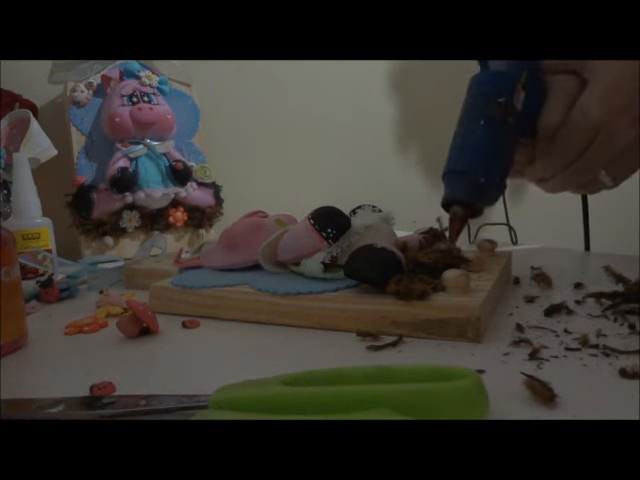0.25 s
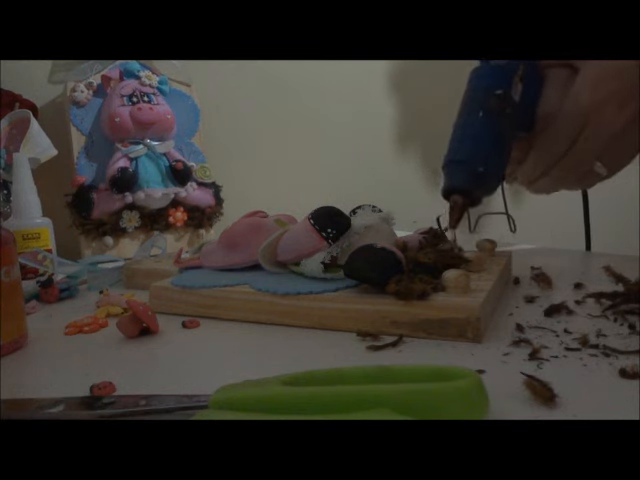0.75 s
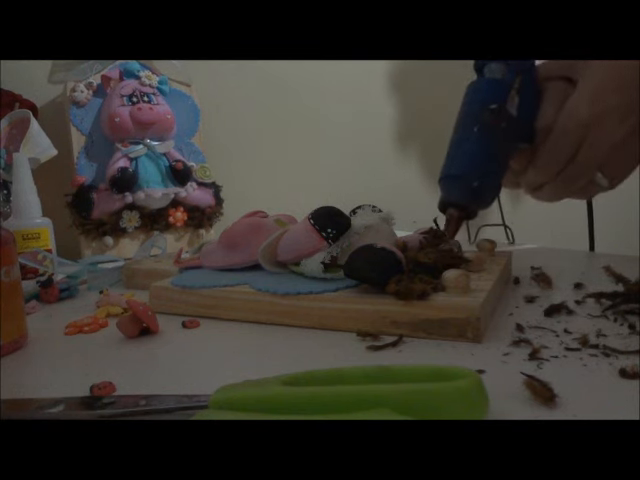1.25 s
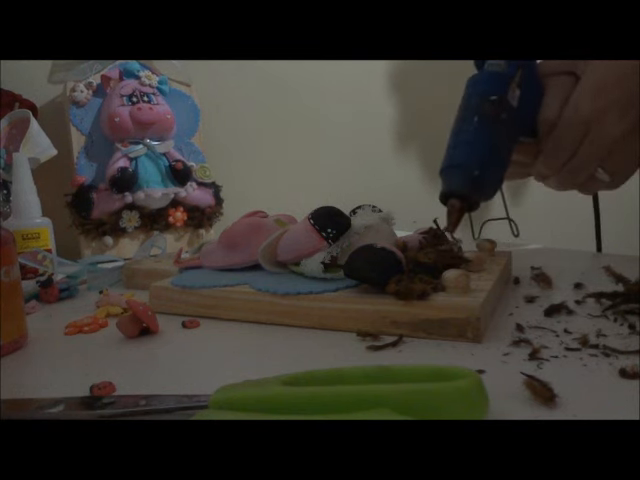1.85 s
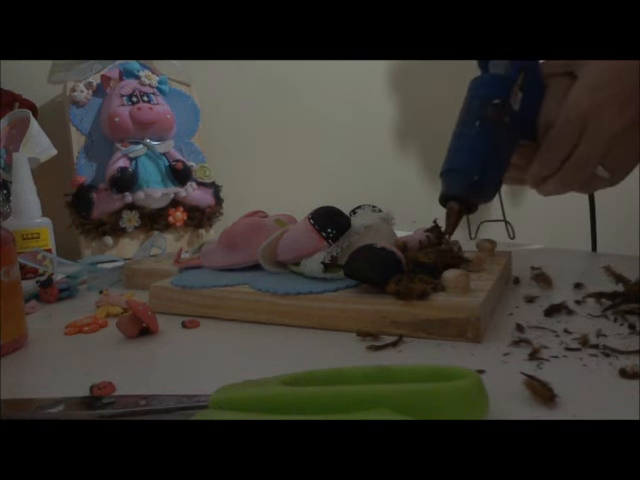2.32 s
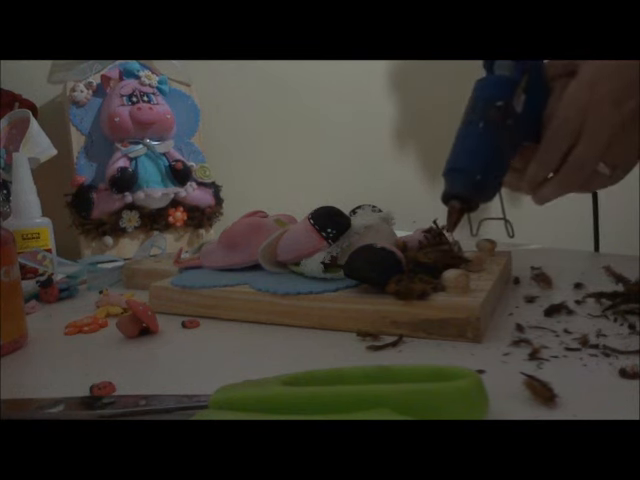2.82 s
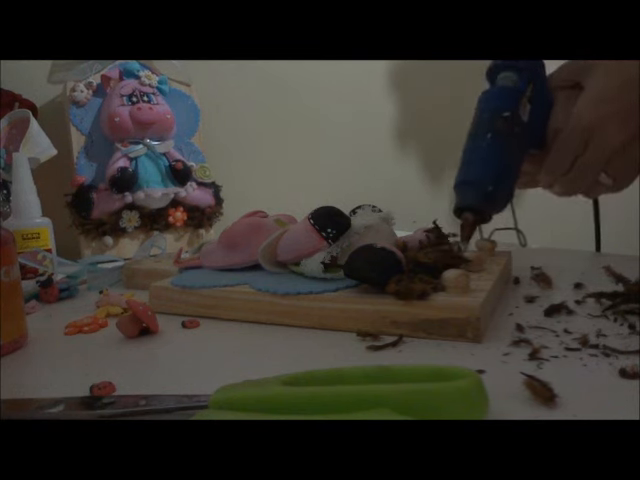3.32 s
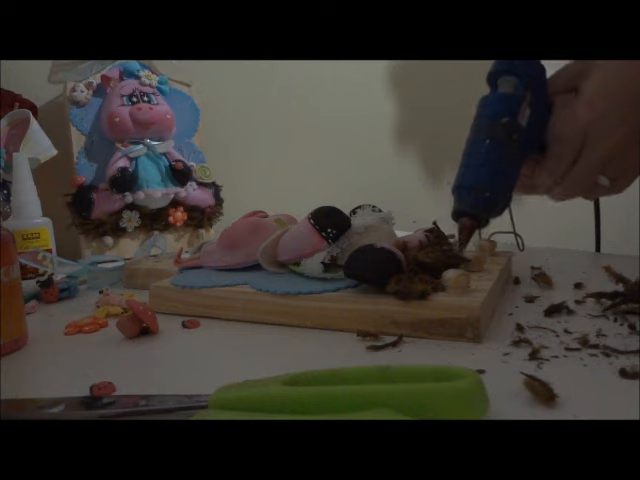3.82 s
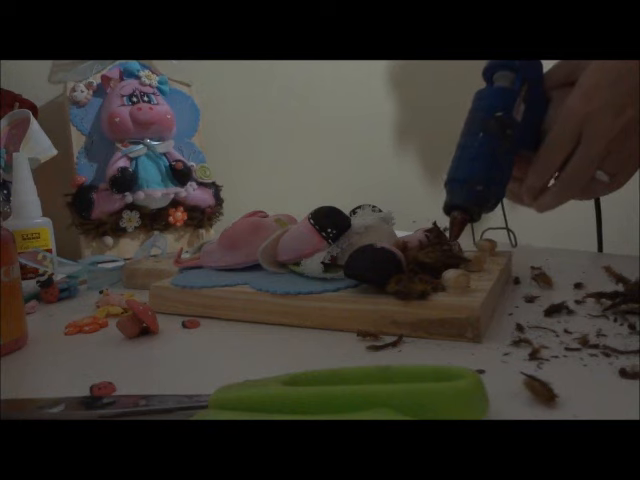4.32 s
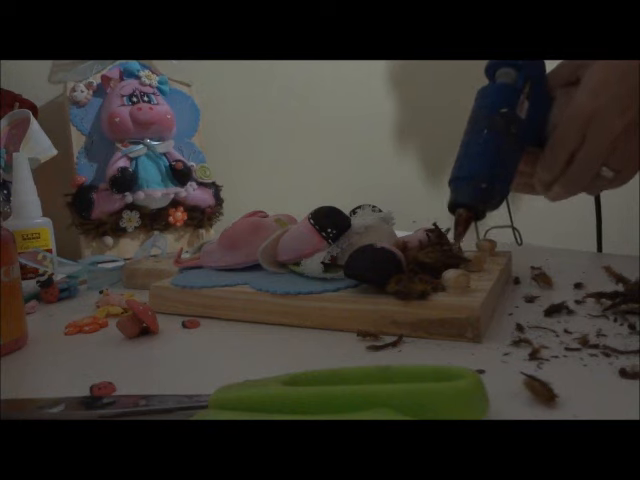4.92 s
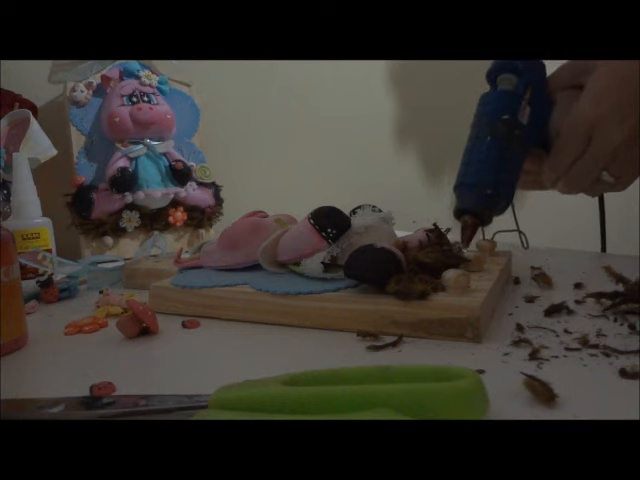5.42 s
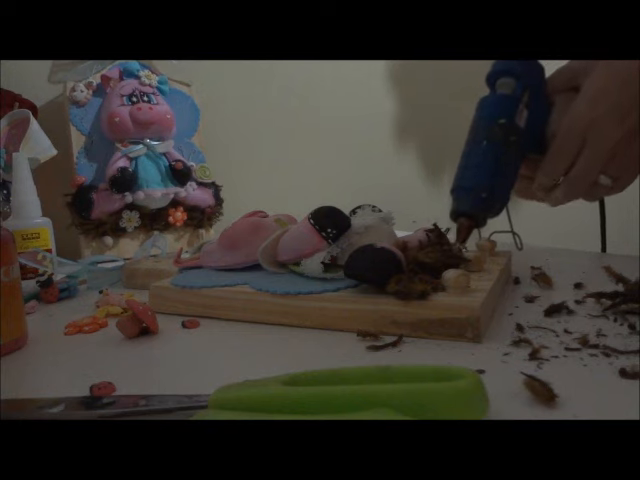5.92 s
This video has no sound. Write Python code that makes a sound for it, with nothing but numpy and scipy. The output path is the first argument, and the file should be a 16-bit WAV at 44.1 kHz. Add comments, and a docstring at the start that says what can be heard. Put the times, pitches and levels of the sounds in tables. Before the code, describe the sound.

A hot glue gun's trigger is pumped nine times at a steady pace. Each squeeze gives a short plastic creak as the glue stick feeds. Between squeezes the trigger clicks sharply and a spring pulls the feed back with a brief rasp. Something softly bumps the table at the end. The gun is slightly right of the microphones, in a small, quiet room.

```python
"""A plastic creak opens the scene: a hot glue gun is squeezed nine times in a small, quiet room.
Each squeeze creaks because the feed, the part that pushes the glue stick, keeps sticking and slipping;
some end in one hard, clicking slip. Between squeezes the trigger clicks as the finger eases off, and
a spring drags the feed back in a short rasp. Something softly bumps the craft table at the end."""
import sys
import numpy as np
from scipy import signal
from scipy.fft import rfft, irfft
from scipy.io import wavfile
from scipy.ndimage import uniform_filter1d, minimum_filter1d

SR = 44100
rng = np.random.default_rng(int(sys.argv[2]) if len(sys.argv) > 2 else 0)


def output_pcm(signal):
    """Save a mono or channel-first signal as 16-bit PCM at the path in sys.argv[1].

    Samples are clipped to [-1, 1] before scaling.
    """
    pcm = np.clip(np.atleast_2d(signal).T, -1, 1) * 32767
    wavfile.write(sys.argv[1], SR, np.round(pcm).astype(np.int16))


N = 271950
FILTER_HZ = np.fft.rfftfreq(8192, 1 / SR)

# One row for each squeeze. The "bite" is the moment the feed takes hold of the glue stick.
# start_s, bite_s, end_s, bite_slips_per_s, middle_slips_per_s, end_slips_per_s, pressure_build_s,
# creep_db, squeak_db, knock_db, tick_db, squeak_change_db, end_treble_db
SQUEEZES = [ (-0.15, -0.068, 0.234, 74.7, 67.4, 58.6, 0.011, 0, -26.5, -25, -30, -5.5, -1),
            (0.727, 0.793, 1.111, 72, 87.7, 63.4, 0.15, -6, -22, -23.5, -25, -3.5, 0),
            (1.568, 1.616, 1.839, 89, 85, 92.6, 0.13, -8, -20.5, -21, -26.5, -4.5, -9),
            (2.259, 2.336, 2.586, 103.4, 57.8, 97, 0.017, 2.5, -19.5, -24, -27, -8.5, -3),
            (3.01, 3.066, 3.279, 76, 90, 80, .036, -3, -20.5, -23, -27.5, -4, -8.5),
            (3.678, 3.767, 4.012, 100, 81.6, 71, .02, 3, -20.5, -23.5, -26.5, -8.5, -4),
            (4.464, 4.555, 4.839, 58.6, 52, 86, 0.017, 10, -21.5, -23.5, -24.5, -5, -7),
            (5.244, 5.307, 5.517, 89, 80, 79, 0.049, 1, -18.5, -21.5, -25.5, -8, -9),
            (5.963, 6.016, 6.155, 99, 98.5, 63, 0.044, -2.5, -20, -19.5, -24, -4, -10), ]


def squeeze_creaks():
    """The feed creeps faintly over the stick, bites, and knocks harder as pressure builds."""
    # tone of a slip knocking on the shell: pitch_hz, level_db
    knock_tone = [(30, -53), (300, -36.5), (480, -25.5), (660, -3), (850, -4.5), (1050, -9.5), (1250, 4),
                  (1700, 0.5), (2050, -6), (2700, -1), (4000, -11), (5200, -9), (8000, -26), (15500, -20)]
    # each group of three is (squeak, knock, tick)
    creep_end_db, creep_rise_db_per_s = (-13, -15, -27.5), (257, 234, 369)
    bite_db = (-11.5, -21, -11.5)  # compared with full pressure
    first_slips_per_s, knock_build_s = 92, 0.064
    knock_growth_db, tick_growth_db = 2.5, 1.5
    strokes = []
    for start, bite, end, early, middle, late, build_s, creep_db, *levels, change_db, _ in SQUEEZES:
        full_db, slips = np.array(levels), []
        for s, stuck_s in slip_times(start, bite - 1 / early, [first_slips_per_s, early], jitter=0.06):
            fade_in_db = np.multiply(creep_rise_db_per_s, s - bite)
            slips.append((s, stuck_s, *(full_db + creep_db + creep_end_db + fade_in_db)))
        for s, stuck_s in slip_times(bite, end, [early, middle, late], jitter=0.06):
            build_db = bite_db * np.exp((bite - s) / np.array([build_s, knock_build_s, build_s]))
            progress = (s - bite) / (end - bite)
            drift_db = np.array([change_db, knock_growth_db, tick_growth_db]) * progress
            slips.append((s, stuck_s, *(full_db + build_db + drift_db)))
        strokes.append([slip for slip in slips if slip[0] >= 0])
    return stick_slip(strokes, knock_tone, squeak_db=-3.0, knock_db=-1.0, tick_db=-3.5, squeak_hz=2021,
                      knock_s=0.0045, tick_s=0.0013, knock_snap=0.11, tick_snap=0.42,
                      force_spread_db=1.82, squeak_spread_db=2.5, tick_spread_db=2.5)


def brighten_with_pressure(creaks):
    """Some squeezes tick more brightly than others, and each brightens as pressure builds."""
    treble = signal.sosfiltfilt(signal.butter(4, 11000, "high", fs=SR, output="sos"), creaks)
    growth_db, points = 8.5, []
    for _, bite, end, *_, end_db in SQUEEZES:
        points += [(bite, end_db - growth_db), (end, end_db)]
    treble_db = np.interp(np.arange(N) / SR, *np.transpose(points))
    return creaks + treble * (gain(treble_db) - 1)


def spring_rasps():
    """The spring snatches the feed back: a quick rise, a short hold, then the rasp dies away."""
    # each pull back: start_s, hold_s, first_slips_per_s, last_slips_per_s, squeak_db, knock_db, tick_db
    pulls = [ (0.471, 0.05, 88, 72.5, -34.5, -21, -23.5), (1.325, 0.043, 86.3, 96, -33, -22.5, -24),
             (2.034, 0.033, 117, 87, -34, -20.5, -25), (2.769, 0.026, 110, 75, -31, -21.5, -24),
             (3.453, 0.026, 81, 86, -31, -20, -23), (4.21, .044, 92, 92, -32, -21, -23.5),
             (5.007, 0.027, 92.7, 73.8, -32.5, -19.5, -22.5), (5.699, 0.031, 101, 67, -29, -21, -23.5), ]
    # tone of the knocks on the way back: pitch_hz, level_db
    rasp_tone = [(30, -46), (300, -36), (500, -25), (660, -2), (830, -4.5), (1050, -8), (1250, 1),
                 (1700, -3.5), (2700, -7), (4000, -16), (5100, -11.5), (8000, -24.5), (16000, -24)]
    length_s, rise_s = 0.145, 0.0067
    # each group of three is (squeak, knock, tick)
    start_db, fall_delay_s, fall_db_per_s = (-4, 0, -11), (0.018, 0.00067, 0.013), (274, 308, 531)
    strokes = []
    for start, hold_s, early, late, *full_db in pulls:
        slips = []
        for t, stuck_s in slip_times(0, length_s, [early, late], jitter=0.1):
            rise_db = np.multiply(start_db, max(1 - t / rise_s, 0))
            fall_db = fall_db_per_s * np.maximum(t - hold_s - np.array(fall_delay_s), 0)
            slips.append((start + t, stuck_s, *(full_db + rise_db - fall_db)))
        strokes.append(slips)
    return stick_slip(strokes, rasp_tone, squeak_db=-1.5, knock_db=-1.46, tick_db=-1.4, squeak_hz=1980,
                      knock_s=0.0059, tick_s=0.0022, knock_snap=0.14, tick_snap=0.36,
                      force_spread_db=1.1, squeak_spread_db=1.3, tick_spread_db=0.5)


def slip_times(start_s, end_s, slips_per_s, jitter):
    """The grip lets go at nearly even steps along the stick. Gives pairs of time_s, stuck_s."""
    t = np.linspace(start_s, end_s, num=50)
    pace = np.interp(t, np.linspace(start_s, end_s, len(slips_per_s)), np.maximum(slips_per_s, 30))
    travel = np.r_[0, np.cumsum((pace[1:] + pace[:-1]) / 2 * np.diff(t))]
    steps = np.linspace(0, travel[-1], round(travel[-1]) + 1)
    steps[1:-1] += jitter * rng.standard_normal(size=60)[:len(steps[1:-1])]
    return zip(np.interp(steps, travel, t), 1 / np.interp(steps, travel, pace))


def stick_slip(strokes, knock_tone, squeak_db, knock_db, tick_db, squeak_hz, knock_s, tick_s,
               knock_snap, tick_snap, force_spread_db, squeak_spread_db, tick_spread_db):
    """Every slip gives a brief squeak, a knock on the shell and a tick, each varied a little by chance."""
    # tone of the squeak: pitch_hz, level_db
    squeak_tone = [(30, -32.5), (400, -31.5), (1000, -4), (1600, -0.5), (2100, -5), (2800, 4.5),
                   (4000, -21.5), (16000, -68)]
    # tone of the tick: pitch_hz, level_db
    tick_tone = [(30, -87), (2000, -18.5), (4000, -7), (5200, -1), (6200, -5), (7700, -2), (9500, -6.5),
                 (11500, -11.5), (14800, -17.5), (16500, -55)]
    squeaks, knocks, ticks = np.zeros((3, N))
    for slips in strokes:
        chances = rng.standard_normal(size=(60, 6)).clip(-1.6, 1.6)
        for (s, stuck_s, squeak_level, knock_level, tick_level), chance in zip(slips, chances):
            size, pitch, length, hard, sharp, clear = chance
            force = np.sqrt(stuck_s * SR) * gain(force_spread_db * size)  # a long hold stores more energy
            squeak_gain = force * gain(squeak_level + squeak_db + squeak_spread_db * clear)
            knock_gain = force * gain(knock_level + knock_db + hard / 2)
            tick_gain = force * gain(tick_level + tick_db + tick_spread_db * sharp)
            add(squeaks, s, squeak_gain * squeak(squeak_hz * (1 + 0.035 * pitch), np.exp(length / 10)))
            add(knocks, s, knock_gain * contact(knock_s, knock_snap))
            add(ticks, s, tick_gain * contact(tick_s, tick_snap))
    return shape_tone(squeaks, squeak_tone) + shape_tone(knocks, knock_tone) + shape_tone(ticks, tick_tone)


def squeak(pitch_hz, stretch):
    """The feed sings for about seven vibrations while it slides."""
    cycles = pitch_hz * np.arange(500) / SR
    fade = np.exp(-(cycles / (7 * stretch)) ** 4)
    return unit_energy(np.sin(2 * np.pi * cycles) * fade)


def contact(decay_s, snap):
    """A sharp snap and a short spray of tiny slips that stops as the surfaces grip again."""
    t = np.arange(700) / SR
    spray = unit_energy(rng.standard_normal(len(t)) * np.exp(-(t / decay_s) ** 2))
    spray[0] += snap
    return unit_energy(even_out(spray, width_bins=24))


def plastic_shell(sound):
    """The gun's hollow plastic shell rings on after every contact."""
    # ringing notes of the shell: pitch_hz, width_hz, level_db
    notes = [(460, 51, 2.5), (693.6, 55, 5.5), (1248, 34, -1.5), (1461, 72, -1), (2075, 18, -8),
             (2148, 19, -0.5), (2416, 87, -1.5), (2530, 42, -5), (2890, 100, -7.5), (3465, 100, 2),
             (4964, 82, -1.5), (7060, 67, -8)]
    power = 1 + sum((gain(db) ** 2 + 2 * gain(db)) / (1 + (2 * (FILTER_HZ - hz) / width_hz) ** 2)
                    for hz, width_hz, db in notes)
    return signal.oaconvolve(sound, make_filter(np.sqrt(power)))[:N]


def plastic_clicks(boost_db, decay_s, snap):
    """Sharp clicks: the hard last slip of some squeezes, and the trigger snapping between squeezes."""
    # each click: start_s, level_db, extra_handle_db
    clicks = [(0.253, -4.5, -17), (0.304, -4, -9), (0.353, -8.5, 5), (0.367, -3.5, -18),
              (1.146, -3.5, -7.5), (1.191, -5.5, -6), (1.255, -6.5, -6.5), (1.878, -4.5, -2.5),
              (1.946, -9.5, 4), (2.603, -8.5, 1), (2.653, -4.5, -2), (3.318, -5, -1), (3.377, -3, -7),
              (4.031, -6, 0), (4.069, -4, -3), (4.116, -5.5, -4.5), (4.877, -4, -1), (4.946, -5, -3),
              (5.564, -3.5, -4.5), (5.633, -5.5, -2.5)]
    # tone of the snap: pitch_hz, level_db
    click_tone = [(30, -22.5), (130, -28), (300, -27), (520, -19.5), (680, -17.5), (1000, -8.5), (1400, 0),
                  (2100, 0), (3000, 1), (3480, 3.5), (4300, -3.5), (5400, 2), (8000, -3), (15500, -22.5)]
    # tone of the hollow handle: pitch_hz, level_db
    handle_tone = [(30, -45), (400, -41.5), (680, -6), (1000, -18.5), (1250, 1.5), (1600, -6.5),
                   (2200, -11), (16000, -31.5)]
    head_on, all_round, knocks = np.zeros((3, N))
    for s, db, extra_handle_db in clicks:
        strength = gain(db + boost_db)
        add(head_on, s, strength * contact(decay_s, snap))
        add(all_round, s, [strength])  # summed over all directions, the spray has a smooth tone
        add(knocks, s, [strength * gain(extra_handle_db)])
    handle = shape_tone(knocks, handle_tone)
    return shape_tone(head_on, click_tone) + handle, shape_tone(all_round, click_tone) + handle


def table_bumps():
    """Dull bumps make the table top ring with its low notes."""
    # each bump: start_s, level_db
    bumps = [(6.101, -41), (6.112, -38), (6.126, -27), (6.147, -32)]
    # notes of the table top: pitch_hz, level_db, ring_s (time to fade by 60 dB)
    notes = [(108, -9, 0.2), (182.6, -6, 0.13), (328, 10, 0.064), (452, 11.5, 0.067), (760, 9, 0.12)]
    t, out = np.arange(SR // 4) / SR, np.zeros(N)
    ring = sum(gain(db - 60 * t / ring_s) * np.sin(2 * np.pi * hz * t) for hz, db, ring_s in notes)
    soft_start = 1 - np.exp(-t / 0.0084)
    for s, db in bumps:
        add(out, s, gain(db) * ring * soft_start)
    return out


def room_echo(sound, stereo_width):
    """Near walls answer after 2 ms and fade fast; the echo pattern shifts as the hand moves."""
    # how long the room rings: pitch_hz, ring_s (time to fade by 60 dB)
    ring_times = [(200, 0.47), (600, 0.068), (1400, 0.12), (3700, 0.13), (10000, 0.12), (16000, 0.15)]
    # strength of the echo compared with the direct sound: pitch_hz, level_db
    echo_tone = [(300, -2.5), (700, -5), (1400, -9), (2500, -2), (5000, -4.5), (12000, -6.5)]
    hz, t, noise = signal.stft(rng.standard_normal((3, 3, SR // 4)), SR, nperseg=256)
    fade = gain(-60 * t / curve_at(ring_times, hz)[:, None])
    tails = signal.istft(noise * fade, SR, nperseg=256)[1]
    tails = np.pad(even_out(tails, width_bins=50), ((0, 0), (0, 0), (90, 0)))  # 90 samples is 2 ms
    sent = signal.oaconvolve(sound, make_filter(gain(curve_at(echo_tone, FILTER_HZ))))[:N]
    shift_hz = 2.5
    turns = np.arange(N) / SR * shift_hz
    out = np.zeros((2, N))
    for k, (shared, left, right) in enumerate(tails):
        # the three patterns take turns while their total power stays the same
        share = np.sqrt(2 / len(tails)) * np.cos(2 * np.pi * (turns + k / len(tails)))
        pair = np.array([unit_energy(shared + stereo_width * side) for side in (left, right)])
        out += signal.oaconvolve((sent * share)[None], pair, axes=1)[:, :N]
    return out


def place_in_stereo(sound):
    """The gun sits a little to the right of two closely spaced microphones."""
    # how much louder the left side is: pitch_hz, left_minus_right_db
    balance = [(100, -2), (380, 3), (700, 0), (1290, -3.5), (2380, -2), (4400, -0.5), (8100, -2.5),
               (15000, 1)]
    # how far the left wave runs ahead: pitch_hz, lead_radians
    left_lead = [(100, -0.54), (860, -0.43), (1810, -0.23), (2150, -0.51), (2410, 0.63), (2670, -0.24),
                 (7500, -0.14)]
    hz = np.fft.rfftfreq(N, 1 / SR)
    left = gain(curve_at(balance, hz) / 2) * np.exp(0.5j * curve_at(left_lead, hz))
    return irfft(rfft(sound) * np.array([left, 1 / left]), N)


def room_hush(level_db):
    """The faint, steady noise of the room, nearly the same in both ears."""
    # tone of the hush: pitch_hz, level_db
    hush_tone = [(30, -10), (100, -3.5), (150, -3), (260, -4), (400, -2.5), (700, 2.5), (2000, -1),
                 (4000, -8), (10000, -9.5), (16000, -14)]
    tone_gains = gain(curve_at(hush_tone, np.fft.rfftfreq(N, 1 / SR)))
    noise = irfft(rfft(rng.standard_normal((2, N))) * tone_gains, N)
    middle, side = noise / noise.std() * gain(level_db)
    return np.array([middle + side / 4, middle - side / 4])


def gain(db):
    """Turns decibels into a number to multiply by."""
    return 10 ** (np.asarray(db) / 20)


def curve_at(points, hz):
    """Reads between a table's points, with pitch spaced in octaves."""
    pitches, values = np.transpose(points)
    return np.interp(np.log(hz + 1), np.log(pitches + 1), values)


def add(mix, start_s, sound):
    """Lays a sound into the mix."""
    part = mix[max(round(start_s * SR), 0):][:len(sound)]
    part += sound[:len(part)]


def unit_energy(sound):
    """Scales a sound to an energy of 1."""
    return sound / np.sqrt(np.sum(sound ** 2) + 1e-20)


def make_filter(gains):
    """The quickest-acting filter that has these gains from low pitch to high."""
    log_gain = np.log(np.maximum(np.r_[gains, gains[-2:0:-1]], 1e-5))
    spectrum = np.exp(np.conj(signal.hilbert(log_gain)))
    return np.fft.ifft(spectrum).real[:4096]


def shape_tone(pulses, tone):
    """Gives plain pulses the tone set out in a table."""
    tone_filter = make_filter(gain(curve_at(tone, FILTER_HZ)))
    return signal.oaconvolve(pulses, unit_energy(tone_filter))[:N]


def even_out(burst, width_bins):
    """Evens out a burst of noise so that no broad range of pitches stands out."""
    spectrum = rfft(burst, 2 * burst.shape[-1])
    smooth_power = uniform_filter1d(abs(spectrum) ** 2, size=width_bins, axis=-1)
    return irfft(spectrum / np.sqrt(abs(smooth_power) + 1e-12))[..., :burst.shape[-1]]


def scene():
    """Creaks and rasps ring through the shell, then join the clicks and bumps in the room."""
    feed = brighten_with_pressure(squeeze_creaks()) + spring_rasps()
    feed_and_table = plastic_shell(feed) + table_bumps()
    clicks_head_on, clicks_all_round = plastic_clicks(boost_db=11.0, decay_s=0.002, snap=0.42)
    echo = room_echo(feed_and_table + clicks_all_round, stereo_width=0.43)
    return place_in_stereo(feed_and_table + clicks_head_on + echo) + room_hush(level_db=-56.5)


def record(dry):
    """A quick limiter turns down peaks that pass full scale; then the highest treble is cut."""
    allowed = 1 / np.maximum(abs(dry).max(0), 1)
    volume = uniform_filter1d(minimum_filter1d(allowed, size=91), size=91)
    treble_cut = signal.firwin(255, cutoff=16200, window=("kaiser", 8), fs=SR)
    return signal.oaconvolve(dry * volume, treble_cut[None], "same")


dry = scene()
out = record(dry)
output_pcm(out)
```